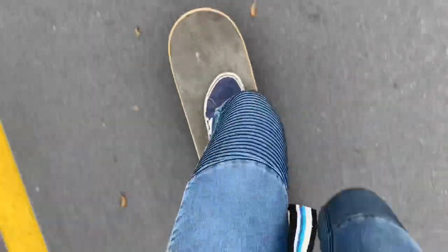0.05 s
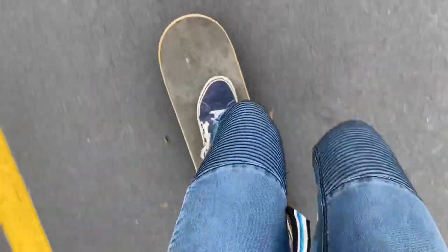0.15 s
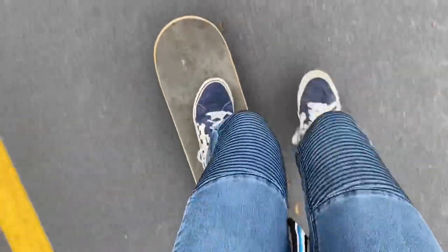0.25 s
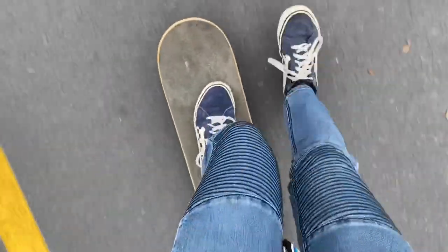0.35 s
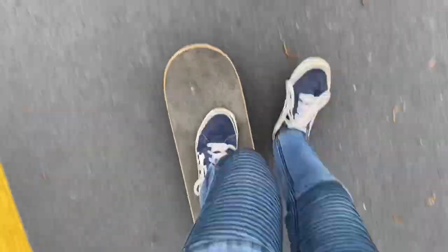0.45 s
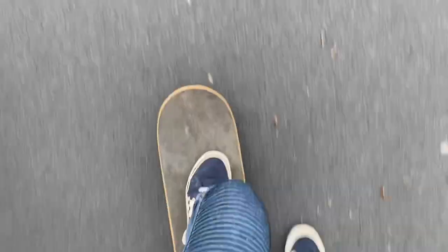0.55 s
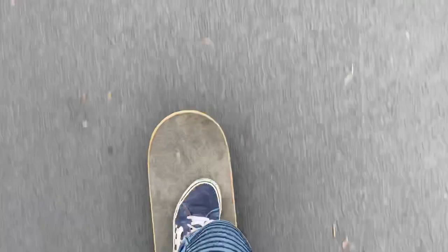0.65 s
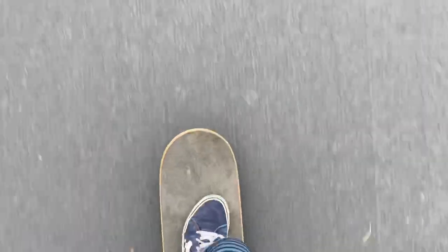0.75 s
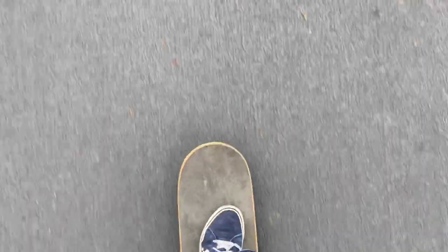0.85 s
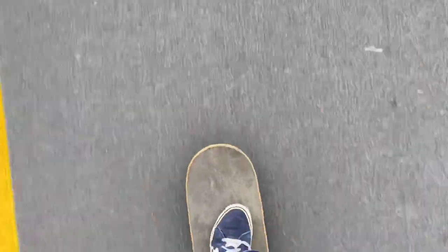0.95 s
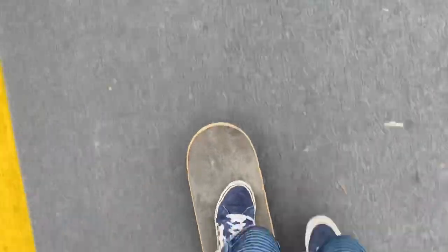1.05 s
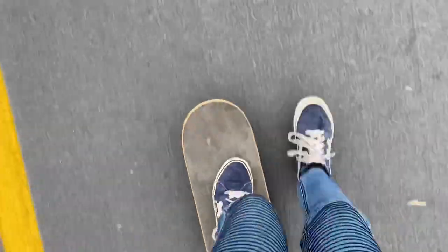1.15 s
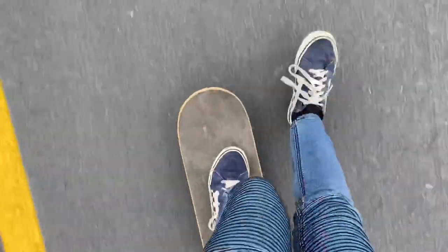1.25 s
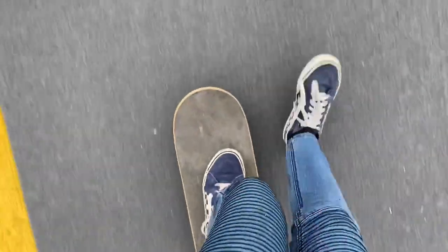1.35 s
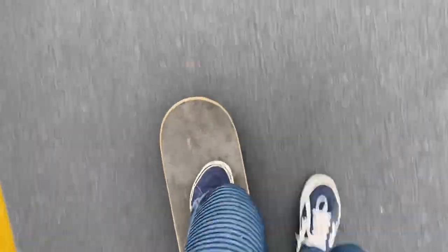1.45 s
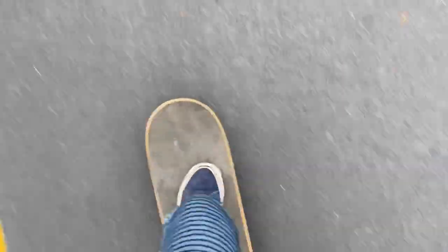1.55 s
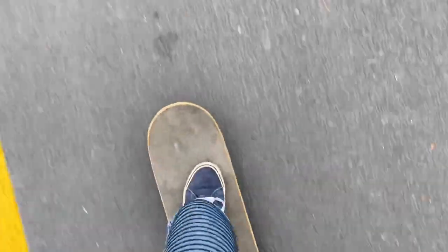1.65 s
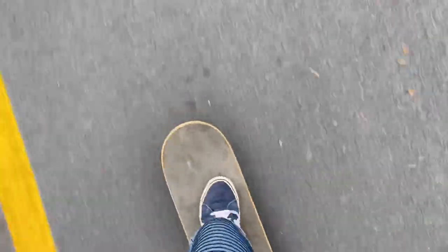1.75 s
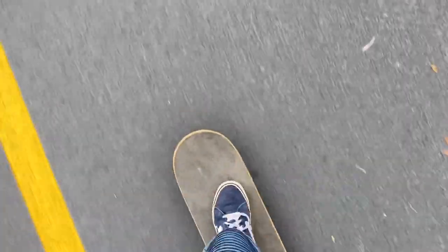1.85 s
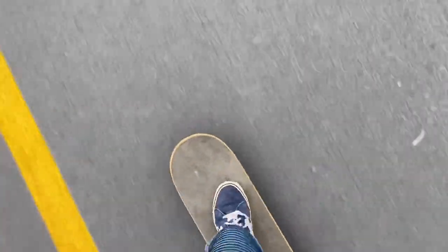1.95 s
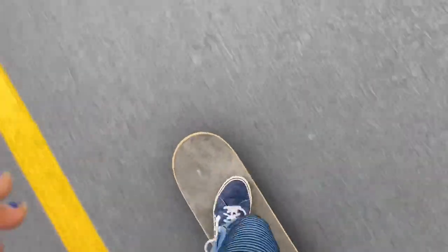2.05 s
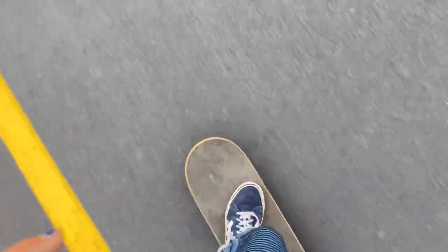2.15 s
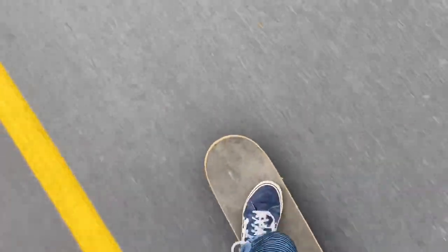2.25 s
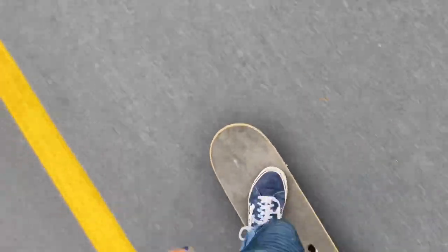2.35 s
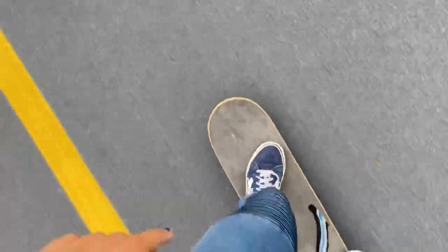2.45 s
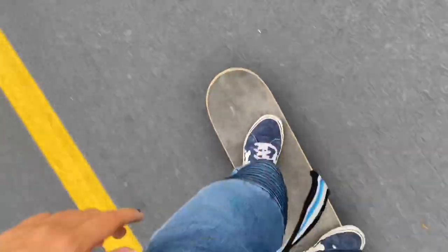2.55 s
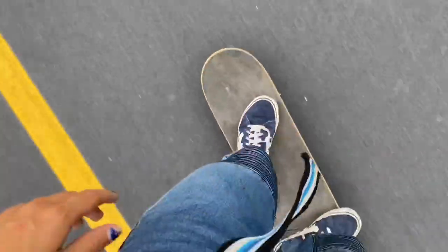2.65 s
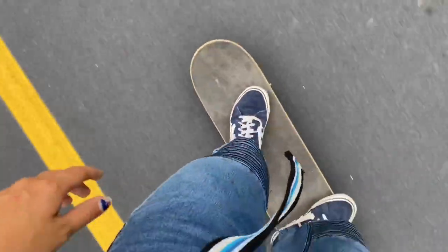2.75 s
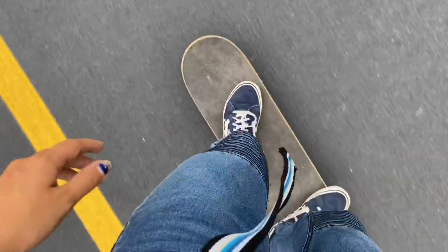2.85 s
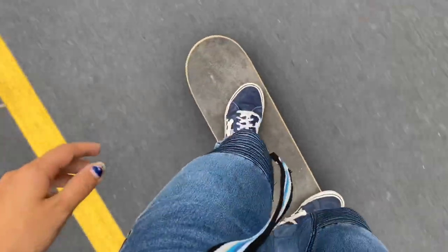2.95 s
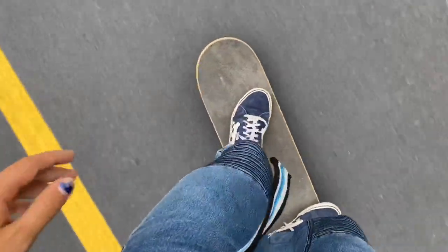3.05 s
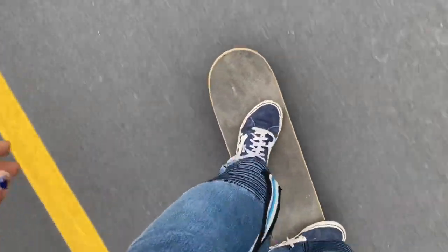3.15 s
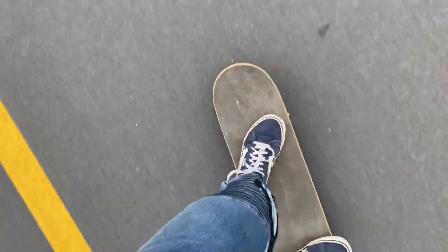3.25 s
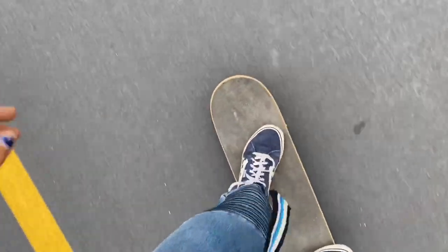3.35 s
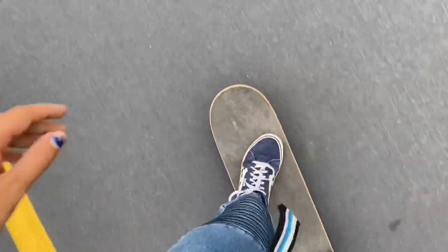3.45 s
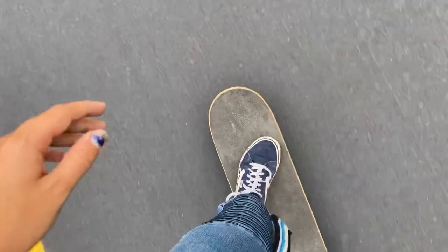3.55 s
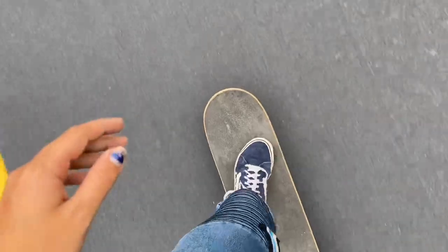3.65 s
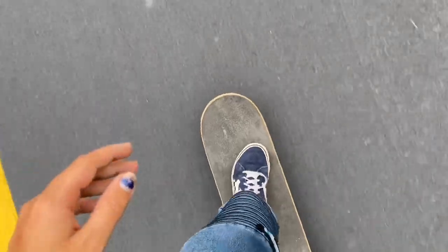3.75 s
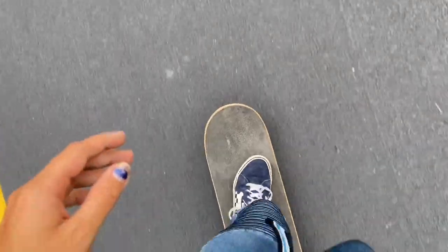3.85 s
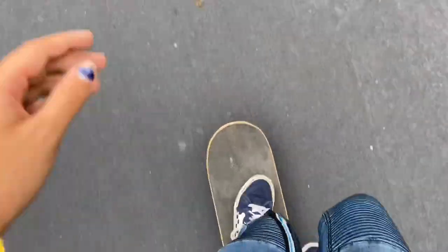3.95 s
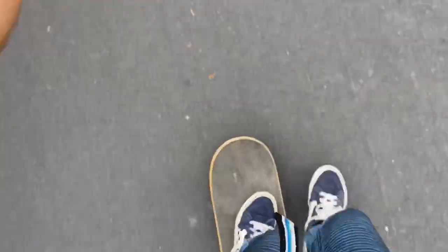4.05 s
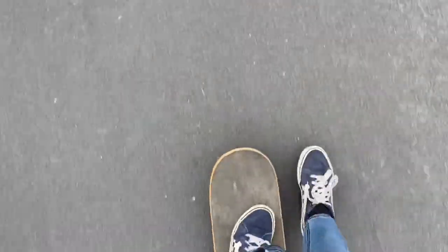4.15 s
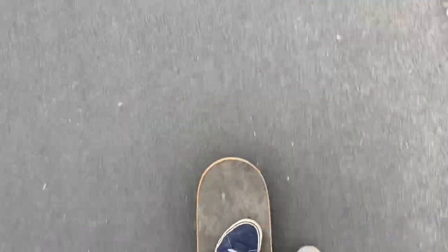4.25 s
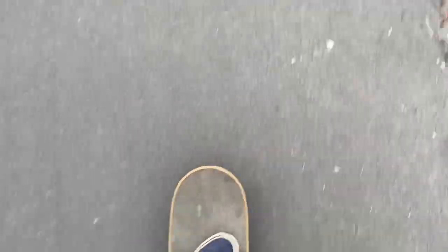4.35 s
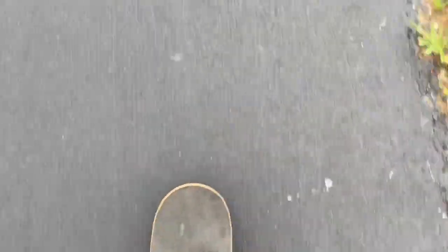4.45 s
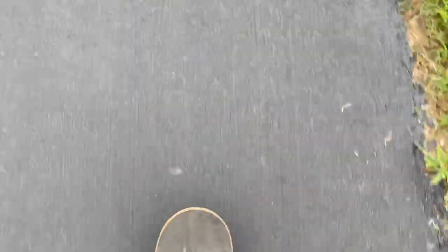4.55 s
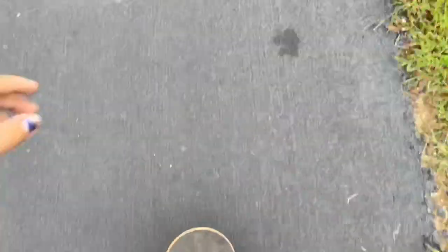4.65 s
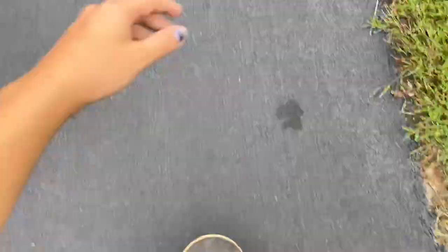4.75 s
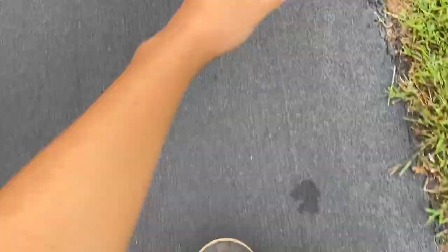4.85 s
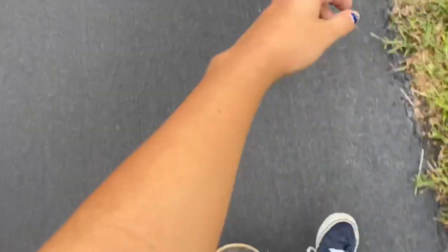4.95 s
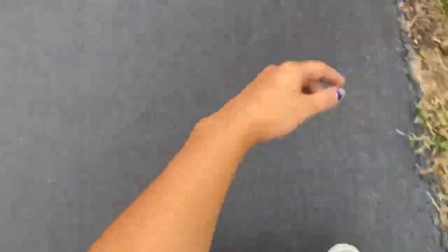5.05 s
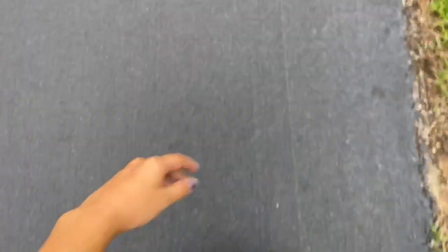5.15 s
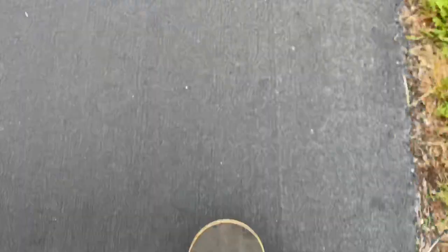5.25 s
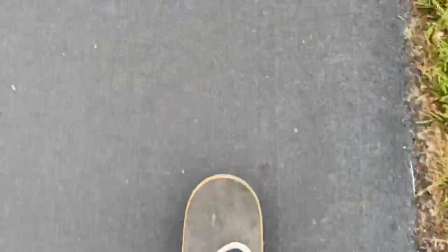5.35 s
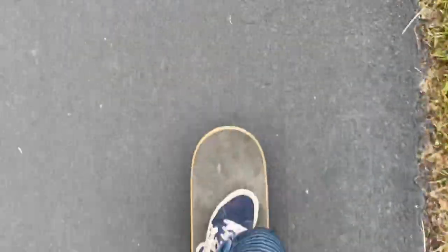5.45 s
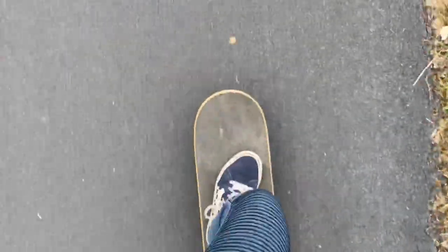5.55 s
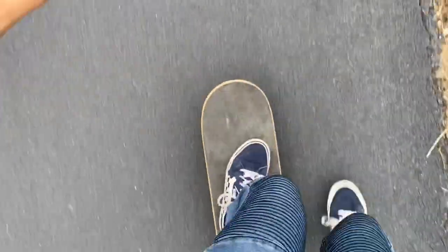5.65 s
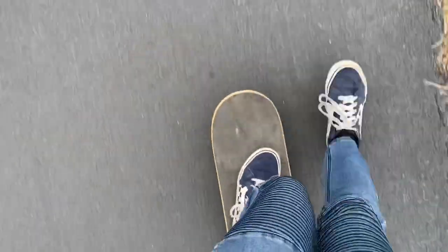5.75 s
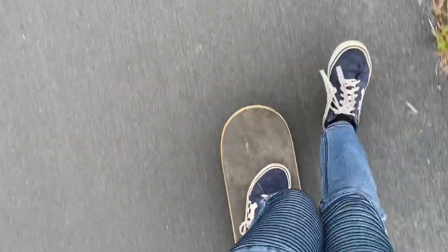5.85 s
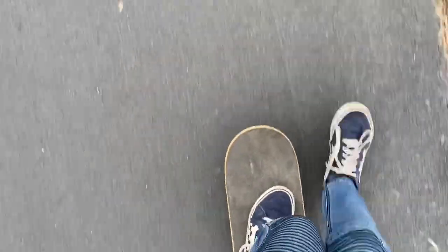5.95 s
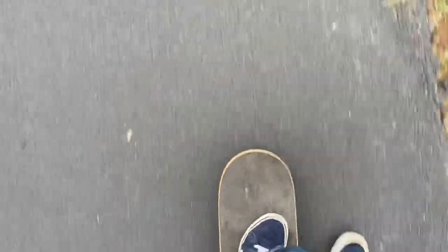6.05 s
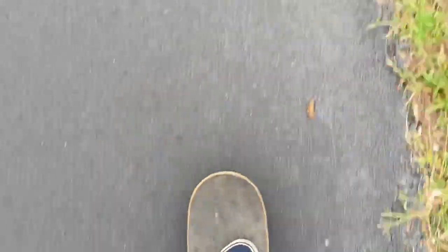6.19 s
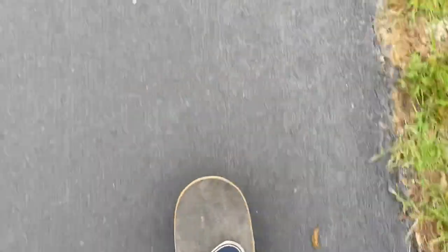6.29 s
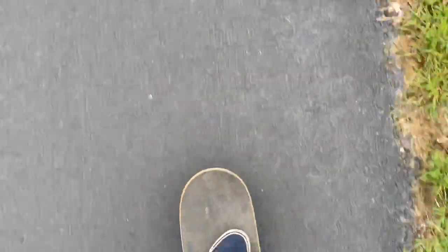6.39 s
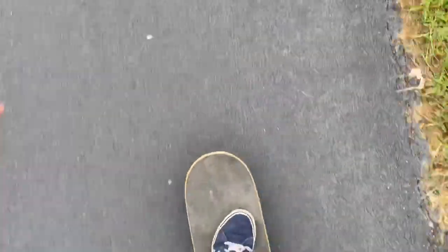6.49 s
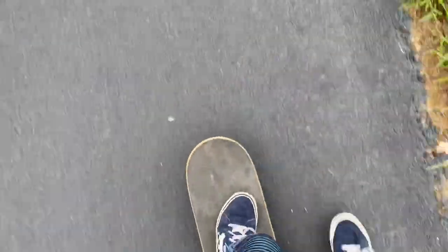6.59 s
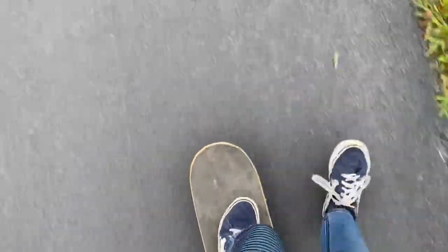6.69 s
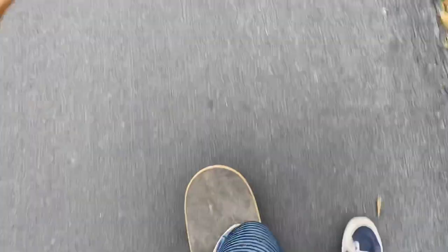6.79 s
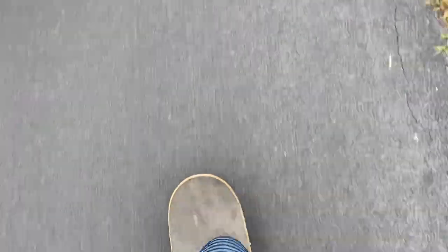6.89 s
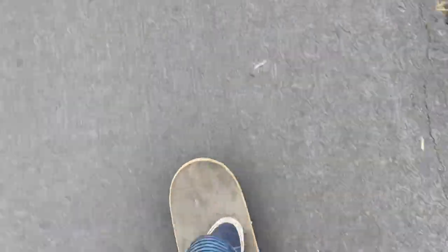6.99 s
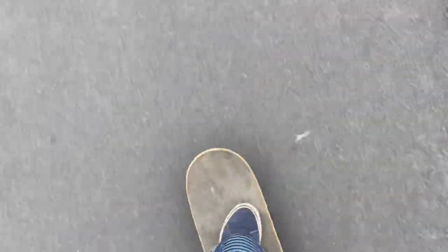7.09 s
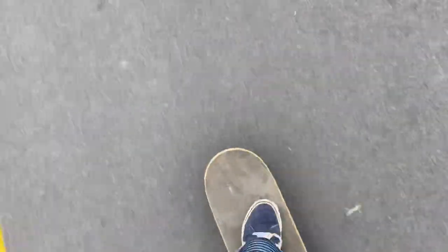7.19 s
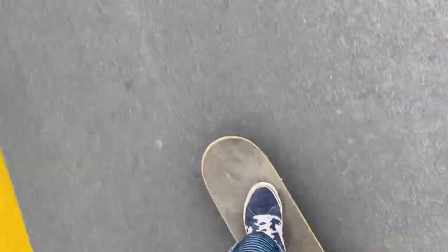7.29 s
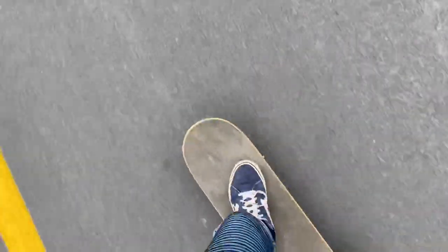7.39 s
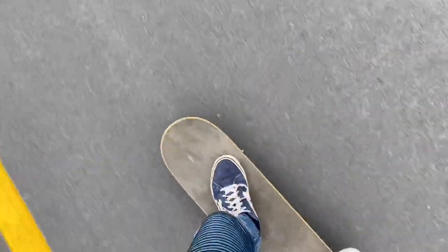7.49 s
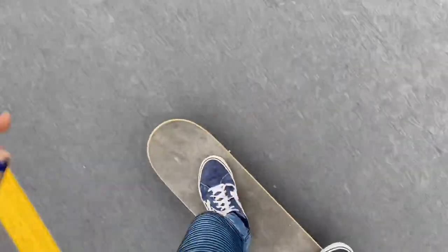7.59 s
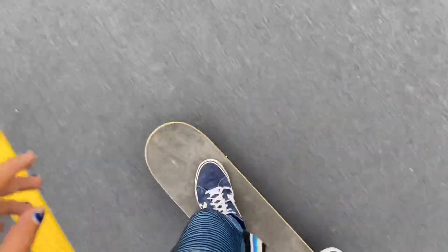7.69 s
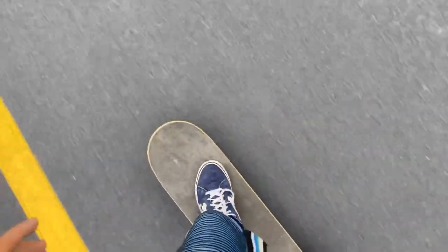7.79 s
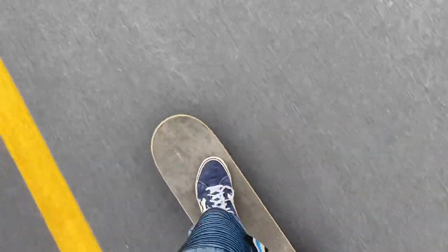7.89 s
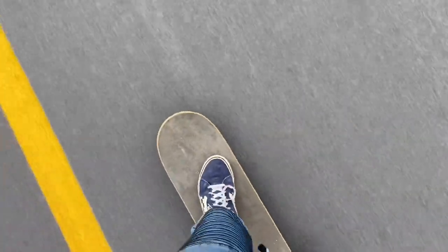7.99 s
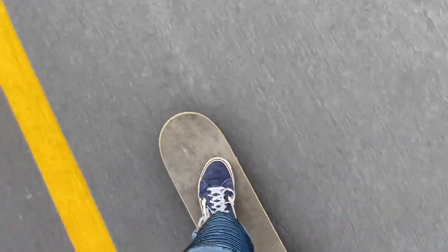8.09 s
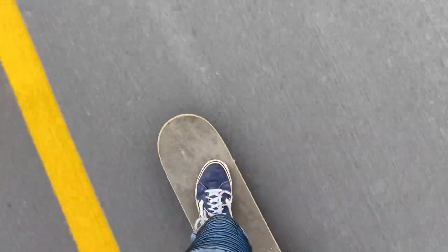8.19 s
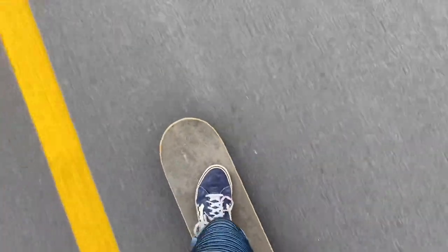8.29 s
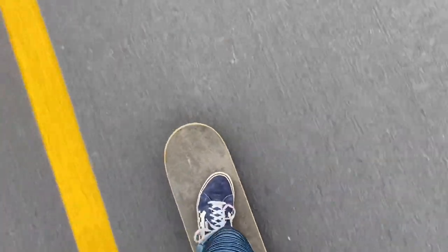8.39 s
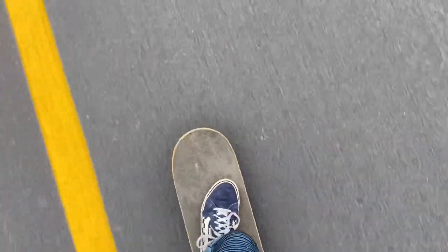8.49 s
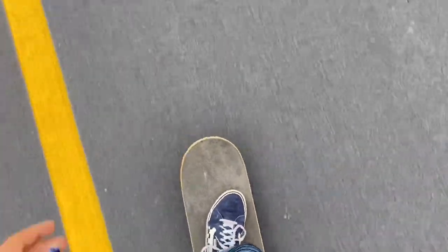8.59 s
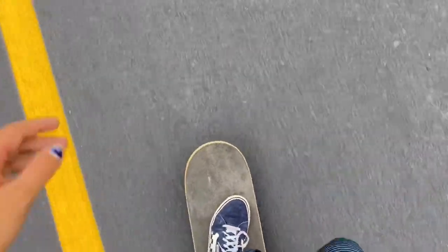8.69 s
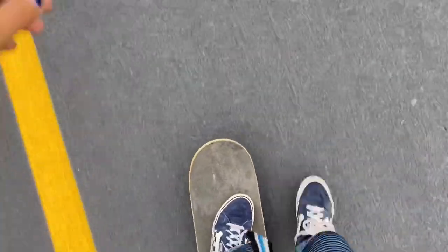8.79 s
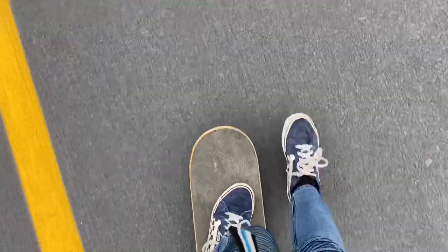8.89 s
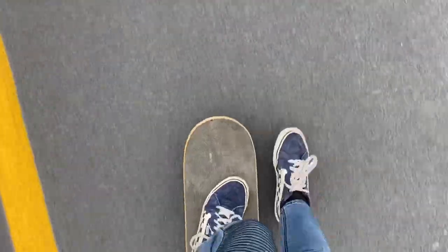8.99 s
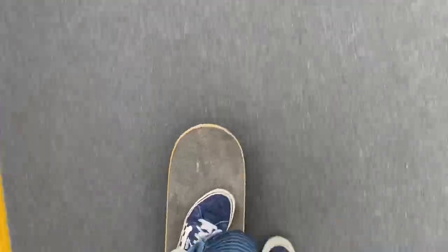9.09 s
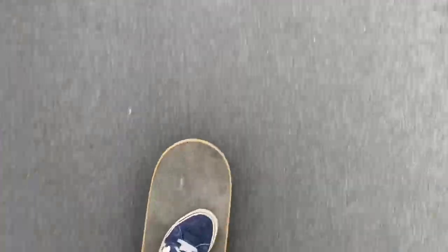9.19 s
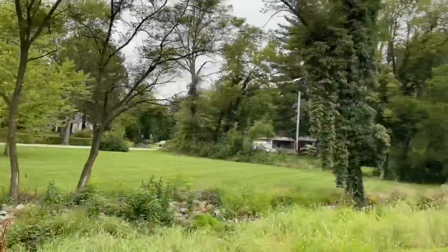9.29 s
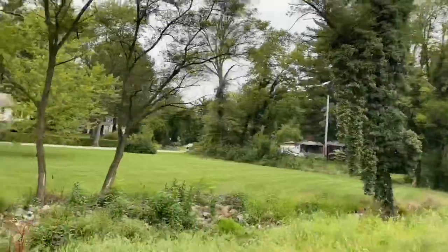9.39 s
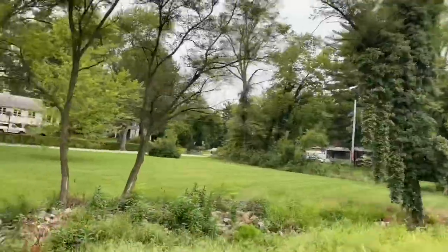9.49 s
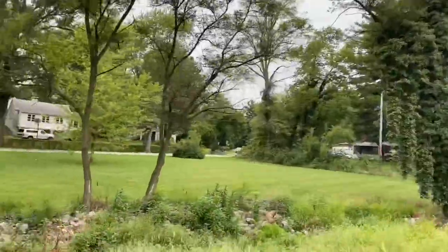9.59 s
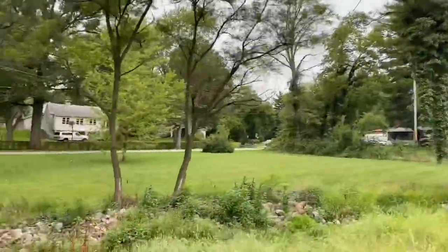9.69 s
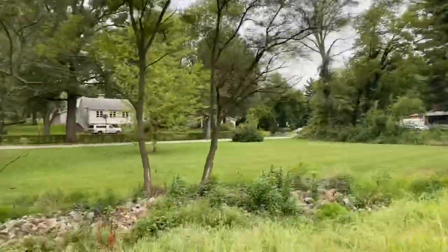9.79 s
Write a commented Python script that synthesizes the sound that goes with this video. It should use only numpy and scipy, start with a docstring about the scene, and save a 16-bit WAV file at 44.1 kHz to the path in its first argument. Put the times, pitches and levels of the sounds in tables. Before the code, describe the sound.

Hard skateboard wheels roll on rough asphalt outdoors, captured close from above by a hand-held stereo phone, stronger on the left. From 0 s a hollow, grainy wooden rumble runs with truck rattle and light hiss; knocks cluster at 0.3-0.65 s and 1.3-1.75 s, with sharp metallic clacks. From 2 to 4 s it is steadier, with few knocks, thinning just before 4 s. At 4.2 s knocks and clatter return, with a soft scrape near 4.7 s, a heavy knock at 5.2 s and dense rattling and bright grit snaps at 6-7 s. From 7.7 s it smooths and quietens; wind thumps at 8.2-8.6 s. Rolling revives at 8.9 s, dips abruptly near 9.23 s, then becomes weak and broken, with strong low wind pops, a brief scrape at 9.6 s and a final stir of rolling. Faint insects and tiny bird whistles sit far behind, clearest after 9.3 s.

```python
"""Hard skateboard wheels roll over rough asphalt, heard from above by a hand-held phone with two ports.
Random impulses from the stones excite modes of deck and trucks; single bursts make knocks, clacks and snaps.
Bands of noise make the wheel hiss, scrapes, wind and insects; falling sines pop the ports.
Small birds far off are short gliding sines, convolved with decaying noise for the smear of the trees.
"""
import sys
import numpy as np
from scipy import signal
from scipy.fft import rfft, irfft, next_fast_len
from scipy.io import wavfile
from scipy.ndimage import uniform_filter1d

SR = 44100
rng = np.random.default_rng(int(sys.argv[2]) if len(sys.argv) > 2 else 0)


def inscribe(sig):
    """Save sig as 16-bit PCM at rate SR to the path in sys.argv[1].

    A 1-D sig is mono; a 2-D sig holds one channel per row.
    Samples are clipped to [-1, 1] before scaling.
    """
    pcm = np.round(np.clip(np.atleast_2d(sig).T, -1, 1) * 32767)
    wavfile.write(sys.argv[1], SR, pcm.astype(np.int16))


N = 433503

# Modes and noise bands, all with columns: centre f/Hz, width of one filter pass/Hz, relative level/dB
LOW_BENDING_MODES = [(265.2, 123, 0)]  # lowest bending of the deck
BENDING_MODES = [(329.7, 122.6, 3), (483, 47, -14)]  # upper bending of the deck
DECK_MODES = [(592.2, 187, 1), (682.7, 200, 0.5), (791.5, 134, -1.5)]  # main ring of the wooden deck
PLATE_MODES = [(951, 243, -0.5), (1232, 287, -10), (1560, 120, -20.5)]  # upper plate modes
TRUCK_MODES = [(1583, 980, 4), (2343, 246, 5.5), (2620, 590, 1)]  # metal of the trucks
WHEEL_BANDS = [(3880, 2800, 5), (5210, 1000, -4), (6160, 1100, 2.5)]  # hiss of the wheels
GRIT_BANDS = [(9700, 8700, -28), (9980, 1600, 4), (14400, 8800, -3.5)]  # grit of the road
SIZZLE_BAND = [(7480, 1800, 0)]  # top hiss of the wheels
RUMBLE_BANDS = [(89.5, 21, -6), (150.5, 199, -3)]  # wind rumble on the ports
BUFFET_BANDS = [(51, 25, -5.5), (73.2, 10, 2)]  # deeper wind buffeting
INSECT_BAND = [(7850, 1300, 0)]  # insects in the grass

# Drive of the deck by the road, with speed and the weight on it: t/s, level/dB before the ducking
ROLL_LEVEL = [(0.0, -21.5), (0.46, -19.5), (0.66, -13.5), (0.76, -22.5), (1.48, -19.5), (1.56, -15.5),
              (1.67, -25), (1.78, -19.5), (1.83, -23), (1.94, -17), (2.0, -24), (2.02, -20.5),
              (3.12, -27.5), (3.5, -25.5), (3.97, -36.5), (4.13, -24), (4.44, -17.5), (4.68, -29),
              (5.17, -21), (5.23, -15), (5.53, -23), (5.78, -24.5), (6.1, -16.5), (6.41, -19), (6.43, -25),
              (6.65, -21), (6.68, -24), (6.95, -18), (7.09, -26.5), (7.28, -18), (7.45, -24), (7.47, -18),
              (7.56, -27.5), (7.64, -22.5), (8.82, -30), (8.9, -20.5), (8.95, -26.5), (9.2, -18.5),
              (9.25, -29), (9.28, -30), (9.5, -37.5), (9.66, -26), (9.69, -30.5), (9.83, -26)]
# Bending of the deck: t/s, lower mode level/dB, upper modes level/dB
FLEX_LEVELS = [(0.0, -19, -21), (0.05, -41, -25), (0.66, -32, -21.5), (0.82, -34.5, -25.5),
               (1.51, -35.5, -23), (2.05, -32, -28.5), (3.45, -36, -31), (3.53, -29.5, -39),
               (3.91, -40, -40.5), (4.27, -35.5, -26), (4.98, -34.5, -35), (5.39, -30, -23.5),
               (5.42, -33.5, -30), (5.67, -35, -32), (6.21, -31, -26), (6.43, -29, -35.5),
               (6.84, -30.5, -30.5), (8.76, -34, -39.5), (9.04, -30, -25.5), (9.22, -45, -26.5),
               (9.39, -29, -35), (9.42, -44, -48), (9.66, -31.5, -32.5), (9.83, -38, -32)]
# Hardware on smooth road: t/s, truck rattle level/dB, upper plate level/dB, grit level/dB
RATTLE_LEVELS = [(0, -54.5, -37, -64), (1.7, -54, -36.5, -63.5), (2.0, -51, -34, -64),
                 (3.0, -58.5, -35, -66.5), (3.7, -54, -37.5, -65), (3.78, -64.5, -44.5, -71.5),
                 (4.65, -60, -44, -66), (5.6, -58, -41, -67), (6.7, -51.5, -37, -54.5),
                 (7.1, -57, -37, -66.5), (8.15, -55.5, -35, -64.5), (8.8, -65.5, -45.5, -71),
                 (9.25, -54, -38.5, -66), (9.5, -71, -55, -77), (9.7, -52.5, -43, -68),
                 (9.83, -53, -43, -72)]
# Hiss of the wheels: t/s, level/dB
HISS_LEVEL = [(0.0, -57), (0.05, -70), (0.16, -60), (0.33, -64), (0.35, -56), (0.68, -57), (0.74, -66),
              (1.04, -58), (1.07, -67), (1.31, -63), (1.37, -56), (1.61, -59), (1.72, -69), (1.8, -57),
              (2.16, -67), (2.22, -62), (2.25, -69), (3.7, -72), (3.75, -74), (4.24, -65), (4.27, -60),
              (4.71, -64), (4.98, -64), (5.17, -52), (5.31, -61), (5.67, -68), (6.1, -53.5), (6.19, -62),
              (6.41, -52.5), (6.71, -55), (6.74, -60), (6.81, -53), (6.84, -56), (7.06, -67), (7.28, -61),
              (7.56, -65), (8.13, -64.5), (8.76, -75), (9.17, -57), (9.25, -71), (9.42, -63), (9.58, -67),
              (9.6, -60), (9.64, -60), (9.8, -65), (9.83, -56)]
# Where the phone points: t/s, left minus right level/dB before each layer takes its share
LEAN = [(0.0, 10.5), (1.53, 9.5), (1.78, 5.5), (3.5, 4.5), (4.24, 8.5), (7.01, 7.5), (7.23, 5), (8.84, 8.5),
        (9.53, 17.5), (9.83, 8)]
# Coarse stretches of road: start t/s, length/s, extra rattle level/dB, extra grit level/dB
# (negative extras have no effect)
COARSE_ROAD = [(0, 0.013, 12, 2), (.33, 0.37, 10, 5), (.81, 0.048, 7, 2), (.95, 0.13, 9.5, 2),
               (1.345, 0.14, 9, 4.5), (1.5, 0.12, 9, 6), (1.79, 0.2, 5.5, 3.5), (2.2, 0.016, 10.5, 3),
               (2.3, 0.041, 0, 4), (3.43, 0.029, -2, 3), (3.955, 0.14, 2.5, 2), (4.15, 0.4, 11.5, 5),
               (4.72, 0.18, 9, 0.5), (4.9, 0.087, 6.5, 0), (5.0, 0.32, 11.5, 5.5), (5.29, 0.25, 8.5, 3.5),
               (5.8, 0.16, 2.5, 1), (5.99, 0.14, 9, 4.5), (6.15, 0.092, 7.5, 1.5), (6.29, 0.36, 7.5, 5),
               (6.8, 0.16, 5, 0.5), (7.21, 0.29, 7, 5), (8.9, 0.34, 5.5, 4.5), (9.275, 0.063, 7, -6),
               (9.36, 0.026, 4.5, -8), (9.6, 0.018, 3, 11), (9.657, 0.008, 8, 3), (9.73, 0.012, 1, 1)]

# Big stones under a wheel: t/s, deck peak level/dB
KNOCKS = [(0.324, -12), (0.373, -11), (0.44, -9), (0.582, -8), (0.629, -6), (1.278, -8), (1.413, -12),
          (1.493, -8), (1.557, -8), (1.602, -8), (1.722, -12), (1.748, -8), (4.201, -13), (4.283, -11),
          (4.313, -11), (4.461, -10), (4.618, -16), (4.833, -16), (5.03, -13), (5.225, -4), (5.33, -8),
          (5.397, -10), (5.537, -12), (5.603, -16), (5.899, -9), (6.017, -9), (6.063, -7), (6.116, -7),
          (6.291, -8), (6.333, -6), (6.412, -10), (6.796, -10), (6.817, -9), (6.83, -8), (6.862, -10),
          (6.902, -10), (6.941, -9), (7.27, -11), (7.449, -10), (7.711, -11), (8.147, -17), (8.907, -13),
          (9.214, -10), (9.292, -19), (9.657, -13), (9.788, -16)]
# Clacks of the trucks: t/s, peak level/dB of the main band, its f/Hz
CLACKS = [(0.0922, -39, 1640), (0.166, -39, 1670), (0.188, -44, 1530), (0.2433, -37.5, 2330),
          (0.2828, -40, 2080), (0.3342, -28, 1530), (0.4414, -38, 1520), (0.465, -26.5, 1500),
          (0.5317, -37, 1590), (0.5727, -35, 2320), (0.6315, -37, 1520), (0.818, -35, 1960),
          (0.839, -38, 1560), (0.9507, -30, 1630), (1.0172, -36, 2230), (1.0335, -31, 1590),
          (1.0794, -34, 1680), (1.2555, -42, 1500), (1.276, -36, 1540), (1.306, -35.5, 1580),
          (1.3313, -33, 1570), (1.358, -27.5, 1550), (1.4227, -29, 1510), (1.458, -23.5, 1810),
          (1.5259, -45, 1550), (1.5755, -31, 1580), (1.778, -40, 1630), (1.7984, -30, 2370),
          (1.8467, -34, 1590), (1.924, -38, 1980), (2.1296, -44, 1520), (2.153, -38, 1890),
          (2.1695, -37, 1640), (2.211, -29.5, 1820), (2.3146, -31, 1810), (2.3471, -37, 1590),
          (2.54, -35, 1680), (2.6868, -37, 1750), (2.817, -36, 1560), (2.9533, -39, 1680),
          (3.0405, -47, 1630), (3.1257, -37, 1510), (3.1537, -39, 1520), (3.4351, -35.5, 1550),
          (3.4555, -29, 2040), (3.524, -41, 1540), (3.692, -36, 2250), (3.9599, -47, 2540),
          (3.9754, -42, 2400), (4.1435, -47, 1530), (4.2007, -43, 2390), (4.259, -36, 1500),
          (4.2906, -39, 1500), (4.343, -40, 1710), (4.4205, -41, 1500), (4.44, -32, 1530),
          (4.4817, -29.5, 1690), (4.7606, -45, 2090), (4.8488, -29.5, 1540), (5.025, -37, 1990),
          (5.0404, -33, 2110), (5.0954, -37, 2330), (5.1425, -32, 2290), (5.2565, -37, 1490),
          (5.2864, -39, 1540), (5.351, -35, 1690), (5.3686, -37, 2330), (5.4051, -39, 2350),
          (5.4495, -45, 1500), (5.8995, -35, 1570), (5.9993, -35, 2280), (6.0651, -27, 1510),
          (6.2903, -32, 2070), (6.3175, -35, 1930), (6.333, -26, 1580), (6.408, -29.5, 1580),
          (6.522, -39, 1770), (6.532, -29, 2260), (6.556, -43, 1500), (6.5868, -27, 1810),
          (6.6932, -36, 1590), (6.8423, -41, 1660), (6.91, -37, 1730), (6.9386, -30.5, 2310),
          (7.056, -40, 1650), (7.0983, -34.5, 1930), (7.1846, -48, 1500), (7.1846, -40, 2360),
          (7.2695, -38, 1840), (7.291, -36, 1510), (7.3532, -39, 1540), (7.4123, -38, 1710),
          (7.433, -30, 1660), (7.5217, -36, 1750), (7.6311, -44, 1530), (7.7109, -42, 1740),
          (7.7937, -32.5, 1510), (7.9503, -40, 1830), (8.0022, -37, 1850), (8.0531, -36, 1870),
          (8.1718, -37, 1810), (8.5285, -45, 1590), (8.552, -40, 1570), (8.6906, -53, 1660),
          (8.7327, -46, 2000), (8.9082, -40, 1990), (8.9316, -37, 1550), (9.1057, -36, 2400),
          (9.1965, -39, 2280), (9.265, -50, 1630), (9.2726, -49, 2370), (9.293, -41, 2440),
          (9.3506, -40, 2200), (9.5926, -37, 1700), (9.594, -35, 1580), (9.6051, -31, 1720),
          (9.657, -37, 1600), (9.7355, -43, 2330), (9.7578, -40, 2260), (9.7892, -36, 2330)]
# Snaps of grit: t/s, peak level/dB of the bright part, dull part level/dB re bright
SNAPS = [(0.1625, -39, -11), (0.493, -38, 4), (0.9642, -40, 2), (1.0156, -45, 7), (1.6282, -45, -9),
         (3.681, -50, 4), (4.1824, -35, -14), (4.294, -45, 7), (4.344, -41, -2), (4.834, -34, -17),
         (5.1422, -41, -3), (5.2026, -38, -4), (5.224, -41, 7), (5.537, -54, 5), (5.733, -39, -13),
         (6.3584, -44, -9), (6.4328, -31, -2), (6.5081, -31, -3), (6.56, -43, -7), (6.786, -43, 8),
         (6.813, -34, 2), (7.2225, -44, 5), (7.2684, -43, -2), (7.2918, -44, 10), (9.1057, -41, 4)]
# Rough scrapes and swishes: start t/s, length/s, centre f/Hz, width of one filter pass/Hz, peak level/dB
SCRAPES = [(4.68, 0.31, 6000, 1300, -49), (8.887, .045, 3400, 500, -52), (9.596, .05, 2090, 1900, -34.5)]

# Air round the ports between gusts: t/s, rumble level/dB, buffeting level/dB, before the ports share it
WIND_LEVELS = [(0, -38, -48), (3.5, -38, -52.5), (3.9, -44.5, -55), (5.3, -39, -53.5), (6.4, -38, -52),
               (6.75, -46, -46), (7.25, -39.5, -54), (7.6, -37.5, -54), (9.83, -37.5, -45)]
# Gusts on the ports: start t/s, length/s, extra rumble level/dB, extra buffeting level/dB
# (negative extras have no effect)
GUSTS = [(0, 0.42, 4, 9.5), (.71, 0.039, 0, 13), (1.422, .06, -2, 0), (5.154, 0.076, -9, 10),
         (7.317, 0.066, 6.5, 13), (8.194, 0.35, 1.5, 17), (8.998, 0.074, -1.5, 16), (9.233, 0.071, 3, 15),
         (9.347, 0.019, 0, 17), (9.42, 0.15, 2, 14), (9.566, 0.094, 8, 18), (9.7, 0.065, -2, 12)]
# Pops of a port by hard gusts: start t/s, peak level/dB, first f/Hz, last f/Hz, length/s,
# left minus right level/dB (a quarter of its size is added to the louder port's peak)
POPS = [(8.251, -23, 55, 40, .03, -1), (8.262, -18, 190, 130, .028, 4), (8.285, -22, 95, 70, .03, 0),
        (8.325, -22, 80, 55, .035, -7), (8.36, -21, 170, 130, .035, 0), (8.422, -21, 100, 75, .035, 0),
        (8.5, -23, 120, 100, .035, 0), (8.548, -21, 150, 70, .025, 0), (9.289, -21, 222, 160, .017, 3),
        (9.368, -12.5, 270, 50, .031, 3), (9.42, -24, 90, 60, .03, 1), (9.453, -24, 130, 90, .022, 0),
        (9.496, -15.5, 150, 100, .028, 2), (9.525, -23, 110, 90, .03, 0), (9.574, -20, 110, 60, .035, 0),
        (9.604, -20, 110, 110, .023, 0), (9.624, -12, 85, 58, .047, 1), (9.75, -23, 90, 70, .035, 0)]
# Insects: t/s, level/dB before the flutter
INSECT_LEVEL = [(0, -67), (3.9, -67.5), (9.1, -66), (9.3, -57), (9.83, -56.5)]
# Bird whistles: start t/s, length/s, first f/Hz, last f/Hz, peak level/dB before flutter and trees
BIRDS = [(0.883, .1, 3940, 4120, -61), (1.045, .14, 4170, 4200, -64), (1.69, .08, 6300, 6350, -66),
         (3.148, 0.053, 4200, 4100, -59), (3.90, .06, 4220, 4120, -72), (4.543, 0.066, 4120, 3930, -64),
         (4.945, .045, 6500, 6350, -63), (4.95, .035, 5600, 5600, -63), (8.18, 0.083, 5700, 5700, -72),
         (8.287, 0.028, 4300, 4260, -60), (8.295, 0.025, 6600, 7500, -58), (8.335, .09, 4230, 4180, -71),
         (8.41, .14, 6400, 6300, -67), (8.862, .11, 5720, 5720, -71), (8.97, 0.041, 4240, 4080, -62),
         (9.36, .015, 6300, 7200, -62), (9.37, 0.032, 4460, 4330, -58), (9.416, 0.02, 4260, 3730, -51),
         (9.435, .016, 3500, 2700, -58), (9.395, .055, 4330, 4500, -63), (9.457, .045, 3450, 3600, -67),
         (9.46, .1, 4600, 4550, -69), (9.564, .012, 5970, 7000, -48), (9.573, .017, 6900, 7500, -49),
         (9.758, .07, 4400, 4700, -62), (9.78, .045, 4250, 4250, -67), (9.755, .015, 3900, 3920, -61)]

# Gap under the deck's ring, from its start on: start t/s, centre f/Hz, width/Hz, mean depth of a pass (0-1)
HOLLOW = (9.25, 465, 170, .66)
# The level dips briefly: start t/s, deepest t/s, end t/s, level/dB at the deepest
DIP = (9.222, 9.238, 9.268, -20)
# Phase by which the left port leads; in the treble it falls behind, unevenly: f/Hz, phase/rad
PORT_PHASE = [(0, 0), (860, -.2), (2930, 1), (3800, .2), (7150, .1), (8700, -3), (9300, -3.3),
              (13200, -9.42), (16000, -13.6)]

COARSE_RISE_S, COARSE_FALL_S = 0.005, 0.0069
PLATE_SHARE = 0.79  # how much of the extra rattle, in dB, reaches the plate
SIZZLE_DB = -2  # re grit
CRUNCH_S, CRUNCH_DB = 0.006, -9
DUCK_S, DUCK_DB = 0.011, -9
KNOCK_LEAD_S = 0.0015  # the ring builds up before it is heard
KNOCK_LOW_DB = -13.5  # bending mode, re knock
CLACK_RISE_S = 0.0035
CLACK_TOP_HZ, CLACK_TOP_DB = 2670, -8  # bright edge, re clack
CLACK_BODY_HZ, CLACK_BODY_DB = 1180, 0  # answer of the plate, re clack
BOUNCE_MIN_S, BOUNCE_MAX_S, BOUNCE_DB, CHATTER_DB = 0.005, 0.011, -8, -3
SCRAPE_ROUGH_DB = 3.5
GUST_RISE_S, GUST_FALL_S, GUST_WAVER_DB = 0.013, 0.072, 2.5
GLIDE_POWER = 0.6  # a whistle makes most of its glide early
TREES_S, TREES_DB = 0.03, -4
LOW_CUT_HZ, TOP_HZ = 48, 15800


def road_pushes():
    """Impulsive excitation: texture under both axles drives the board; rough patches lift all the stones."""
    patches = walk(30)
    front, rear = (stones(rate=1600, spread_db=2.0) * undb(patches) for _ in range(2))
    loose = stones(rate=2000, spread_db=4.2) * undb(1.5 * patches + 1.5 * walk(13))
    fine, finer = (stones(rate=4600, spread_db=3.3) * undb(1.7 * patches + 2.0 * walk(22))
                   for _ in range(2))
    # dozens of short random noise bursts a second roughen the rattle
    bursts = np.convolve(np.abs(stones(rate=45, spread_db=2.0)), np.hanning(int(CRUNCH_S * SR)), "same")
    crunch = rng.standard_normal(N) * bursts * undb(CRUNCH_DB)
    return front, rear, loose, fine, finer, crunch


def knock_ducking():
    """Ducking: the deck's random ring is lowered around each knock, most just before it."""
    duck = np.zeros(N)
    for s, _ in KNOCKS:
        add(duck, s - 1.4 * DUCK_S, np.hanning(int(2 * DUCK_S * SR)), 0)
    return DUCK_DB * duck


def board():
    """Modal superposition: the road's impulses excite the bodies of deck, trucks, wheels and grit."""
    front, rear, loose, fine, finer, crunch = road_pushes()
    deck_db, = curves(ROLL_LEVEL)
    low_db, bend_db = curves(FLEX_LEVELS)
    truck_db, plate_db, grit_db = curves(RATTLE_LEVELS)
    wheel_db, = curves(HISS_LEVEL)
    pan_db, = curves(LEAN)
    shake_db, bright_db = swells(COARSE_ROAD, COARSE_RISE_S, COARSE_FALL_S)
    # (modes, push, level/dB, share of the pan, scattered share)
    layers = [
        (LOW_BENDING_MODES, rear + 0.32 * front, low_db, 0.25, 0.2),
        (BENDING_MODES, rear + 0.71 * front, bend_db, 0.25, 0.15),
        (DECK_MODES, front, deck_db + knock_ducking(), 1.05, 0.1),
        (PLATE_MODES, rear + 0.43 * front + 0.6 * loose, plate_db + PLATE_SHARE * shake_db, 0.3, 0.1),
        (TRUCK_MODES, loose + 0.29 * front + crunch, truck_db + shake_db, 0.6, 0.35),
        (WHEEL_BANDS, fine + 1.96 * loose, wheel_db, 0.3, 0.7),
        (GRIT_BANDS, finer + 0.4 * fine, grit_db + bright_db, 0.02, 0.35),
        (SIZZLE_BAND, fine + 0.1 * finer, grit_db + bright_db + SIZZLE_DB, 0.02, 0.2)]
    out = 0
    for modes, push, db, lean, scatter in layers:
        # the ground and the legs scatter a share that differs between the ports
        wide = ring(rng.standard_normal(N), modes) * np.array([[1], [-1]])
        direct = pan(ring(push, modes, waver_db=1.07), lean * pan_db)
        out = out + undb(db) * (direct + scatter * wide)
    return out


def knocks():
    """Impulse response: a push of about a millisecond sets off the deck's ring and its bending mode."""
    deck, bending = np.zeros((2, N))
    push = np.pad(np.hanning(40), (0, 1500))
    bend_hz, bend_width, _ = BENDING_MODES[0]
    for s, db in KNOCKS:
        # each stone meets the modes differently
        body = sum(undb(mode_db + 2.3 * rng.standard_normal()) * band(push, hz, width, order=3)
                   for hz, width, mode_db in DECK_MODES)
        add(deck, s - KNOCK_LEAD_S, body, db)
        add(bending, s, band(push, bend_hz, bend_width), db + KNOCK_LOW_DB)
    return deck, bending


def clacks():
    """Repeated impact: the loose axle strikes, bounces once and chatters out through three bands."""
    out = np.zeros(N)
    for s, db, hz in CLACKS:
        strike = puff(0.0021) * np.minimum(np.arange(1500) / SR / CLACK_RISE_S, 1)
        delay = int(SR * rng.uniform(BOUNCE_MIN_S, BOUNCE_MAX_S))
        bounce = undb(BOUNCE_DB) * np.roll(strike, delay)
        chatter = undb(CHATTER_DB) * puff(0.0085) * (rng.random(1500) < 0.1)
        jolt = strike + bounce + chatter
        add(out, s, band(jolt, hz, 1400, order=4), db)
        add(out, s, band(jolt, CLACK_TOP_HZ, 1800, order=4), db + CLACK_TOP_DB)
        add(out, s, band(jolt, CLACK_BODY_HZ, 310), db + CLACK_BODY_DB)
    return out


def scrapes():
    """Friction noise: a band of noise whose level fluctuates rapidly within a rise and fall."""
    out = np.zeros(N)
    for s, length, hz, width, db in SCRAPES:
        rub = (rng.standard_normal(N) * undb(SCRAPE_ROUGH_DB * walk(250)))[:int(length * SR)]
        envelope = np.interp(np.linspace(0, 1, len(rub)), [0, 0.06, 0.45, 1], [0, 0.85, 0.8, 0])
        add(out, s, band(rub * envelope, hz, width), db)
    return out


def snaps():
    """Transient radiation: each bit of grit is a dying noise burst with a bright and a dull band."""
    out = np.zeros(N)
    for s, db, dull_db in SNAPS:
        tick = puff(0.0024)
        add(out, s, band(tick, 11000, 4500), db)
        add(out, s, band(tick, 5500, 7800), db + dull_db)
    return out


def hits():
    """Level panning: knocks follow the phone's lean, bending and hardware by a share, snaps stay central."""
    deck, bending = knocks()
    pan_db, = curves(LEAN)
    return pan(deck, pan_db) + pan(bending + clacks() + scrapes(), 0.56 * pan_db) + snaps()


def pops():
    """Low-frequency pressure pulses: hard gusts thump the ports, most of them falling in pitch."""
    out = np.zeros((2, N))
    for s, peak_db, hz0, hz1, length, side_db in POPS:
        along = np.linspace(0, 1, int(length * SR))
        hz = hz0 * (hz1 / hz0) ** along
        pop = np.sin(2 * np.pi * np.cumsum(hz) / SR) * np.sin(np.pi * along ** 0.7)
        sides = undb(np.array([[side_db], [-side_db]]) / 2)
        add(out, s, pop * sides, peak_db + abs(side_db) / 4)
    return out


def wind():
    """Partial coherence: rumble and deeper buffeting are noise partly shared by the two ports."""
    out = 0
    gusts = swells(GUSTS, GUST_RISE_S, GUST_FALL_S)
    for db, gust_db, modes in zip(curves(WIND_LEVELS), gusts, (RUMBLE_BANDS, BUFFET_BANDS)):
        left, right, both = (ring(rng.standard_normal(N), modes) for _ in range(3))
        level = undb(db + gust_db + GUST_WAVER_DB * walk(9))
        out = out + level * (1.02 * np.array([left, right]) + 0.88 * both)
    return out


def insects():
    """Narrow-band noise: a fluttering hiss, nearly the same at both ports."""
    hiss = np.array([ring(rng.standard_normal(N), INSECT_BAND) for _ in range(3)])
    level_db, = curves(INSECT_LEVEL)
    return undb(level_db + 1.3 * walk(15)) * (hiss[0] + 0.098 * hiss[1:])


def birds():
    """Frequency modulation and scattering: gliding whistles are smeared by the trees."""
    whistles = np.zeros(N)
    waver = np.pad(1 + 0.007 * walk(70), (0, SR), mode="edge")
    for s, length, hz0, hz1, db in BIRDS:
        along = np.linspace(0, 1, int(length * SR))
        glide = hz0 + (hz1 - hz0) * along ** GLIDE_POWER
        hz = glide * waver[int(s * SR):][:len(along)]
        envelope = np.abs(np.sin(np.pi * along ** 0.71)) ** 0.5
        add(whistles, s, np.sin(2 * np.pi * np.cumsum(hz) / SR) * envelope, db)
    t = np.arange(SR // 5) / SR
    echoes = rng.standard_normal((2, len(t))) * np.exp(-t / TREES_S) / np.sqrt(TREES_S * SR / 2)
    trees = signal.fftconvolve(whistles[None], echoes, axes=1)[:, :N]
    return whistles * undb(2.2 * walk(70)) + undb(TREES_DB) * trees


def undb(db):
    """Level: amplitude ratio of a level in dB."""
    return 10 ** (np.asarray(db) / 20)


def curves(table):
    """Linear interpolation: the columns of a table as sample-by-sample lines."""
    s, *columns = np.transpose(table)
    return [np.interp(np.arange(N) / SR, s, column) for column in columns]


def swells(table, rise_s, fall_s):
    """Envelopes: positive dB values rise, hold and fall; negative ones have no effect, the largest wins."""
    t = np.arange(N) / SR
    out = np.zeros((len(table[0]) - 2, N))  # one line for each level column
    for s, length, *dbs in table:
        shape = np.interp(t, [s - rise_s, s, s + length, s + length + fall_s], [0, 1, 1, 0])
        out = np.maximum(out, np.outer(dbs, shape))
    return out


def band(x, hz, width, order=2):
    """Resonance: one band-pass, repeated to be steeper."""
    b, a = signal.iirpeak(hz, hz / width, fs=SR)
    for _ in range(order):
        x = signal.lfilter(b, a, x)
    return x


def ring(x, modes, waver_db=0):
    """Modal sum of rms 1; with a waver, each mode swells and sinks at random on its own."""
    y = 0
    for k, (hz, width, db) in enumerate(modes):
        if waver_db:
            db = db + waver_db * walk(3)
        y = y + (-1) ** k * undb(db) * band(x, hz, width)
    return y / np.sqrt(np.mean(y ** 2))


def stones(rate, spread_db):
    """Random impulse train: rate/Hz bumps, a few bigger than the rest, none over four spreads."""
    at, sign, size = rng.random((int(rate * N / SR), 3)).T
    out = np.zeros(N)
    size_db = spread_db * np.minimum(-np.log(1 - size), 4)
    out[(at * N).astype(int)] = np.sign(sign - 0.5) * undb(size_db)
    return out


def walk(rate):
    """Slow random fluctuation: values drawn every 1 / rate s and joined by straight slopes."""
    k = int(SR / rate)
    return uniform_filter1d(np.repeat(rng.standard_normal(N // k + 1), k), k)[:N]


def puff(decay_s):
    """Exponential decay: a short dying burst of noise."""
    t = np.arange(1500) / SR
    return rng.standard_normal(len(t)) * np.exp(-t / decay_s)


def add(out, s, burst, db):
    """Superposition: lays a burst with this peak level at time s."""
    i = int(s * SR)
    burst = burst[..., :N - i]
    out[..., i:i + burst.shape[-1]] += undb(db) * burst / np.abs(burst).max()


def pan(x, db):
    """Level difference: left and right around the same mean amplitude."""
    right = 2 / (1 + undb(db))
    return x * np.array([2 - right, right])


def hollow(x):
    """Band subtraction: late on, a gap of wavering depth opens under the deck's ring."""
    s, hz, width, depth = HOLLOW
    depth = np.clip(depth * (1 + 0.4 * walk(18)), 0, 1)
    for _ in range(2):
        x = x - depth * (np.arange(N) > s * SR) * band(x, hz, width, order=1)
    return x


def scene():
    """Superposition: rolling and wind with the gap, then hits, pops, insects and birds."""
    return hollow(board() + wind()) + hits() + pops() + insects() + birds()


def record(dry):
    """Reception: the ports differ in phase, the level dips once, peaks are rounded, both ends are cut."""
    size = next_fast_len(N + 4096)
    phase = np.interp(np.arange(size // 2 + 1) * SR / size, *np.transpose(PORT_PHASE))
    turn = np.exp(0.5j * np.array([phase, -phase]))  # half the difference to each port
    ports = irfft(rfft(dry, size) * turn, size)[:, :N]
    ports = ports * undb(np.interp(np.arange(N) / SR, DIP[:3], [0, DIP[3], 0]))
    low_cut = signal.butter(2, LOW_CUT_HZ, "high", fs=SR, output="sos")
    ports = signal.sosfilt(low_cut, ports) / 0.98
    ports = np.tanh(ports + ports ** 3 / 3) * 0.98  # only the loudest peaks are rounded
    top_cut = signal.ellip(10, 0.2, 80, TOP_HZ, fs=SR, output="sos")
    return signal.sosfilt(top_cut, ports)


dry = scene()
out = record(dry)
inscribe(out)
```